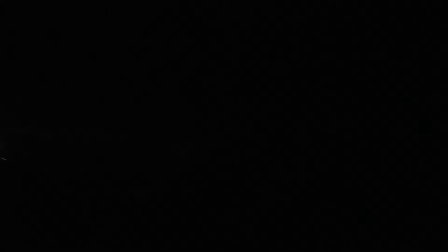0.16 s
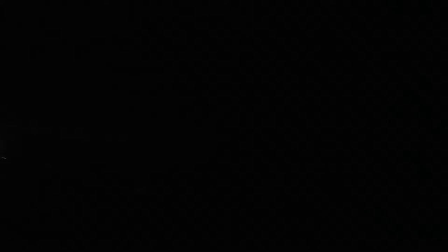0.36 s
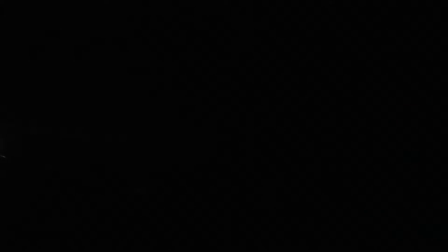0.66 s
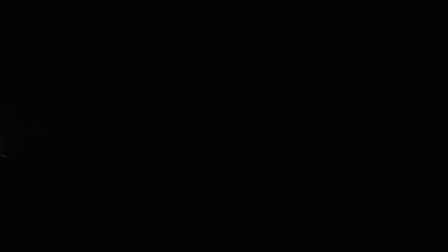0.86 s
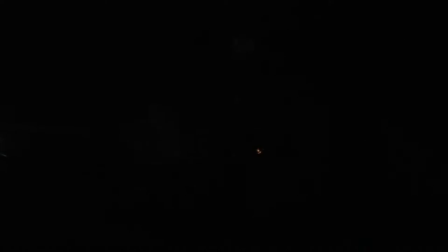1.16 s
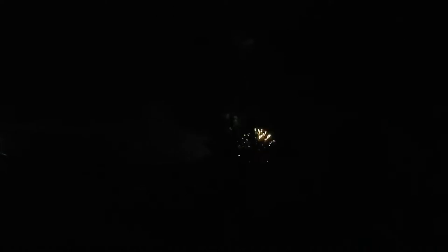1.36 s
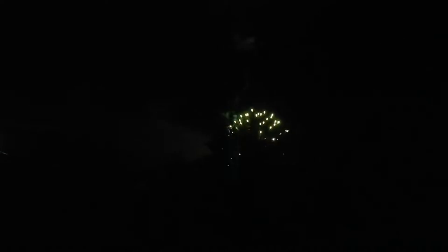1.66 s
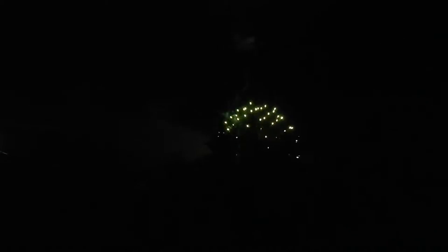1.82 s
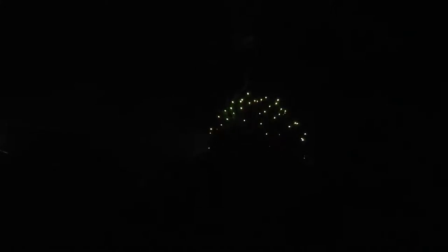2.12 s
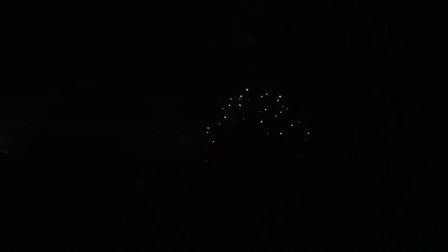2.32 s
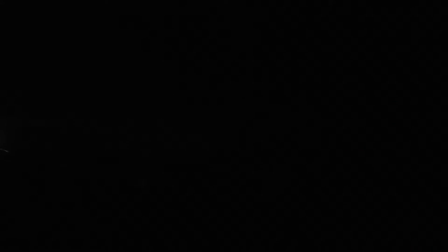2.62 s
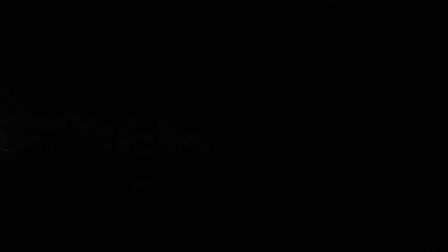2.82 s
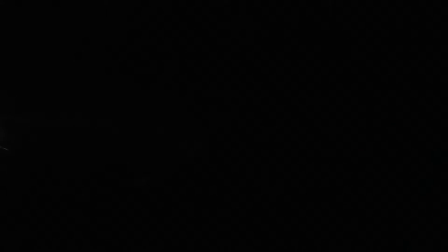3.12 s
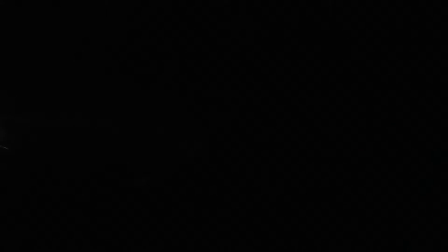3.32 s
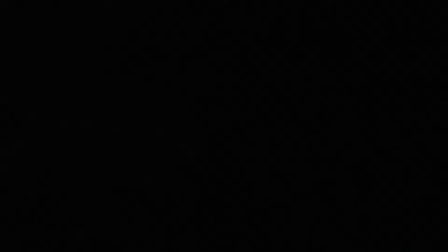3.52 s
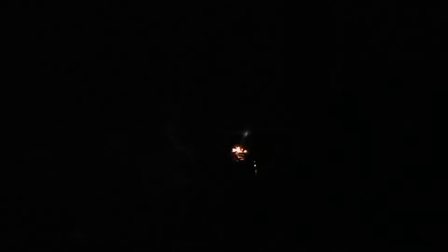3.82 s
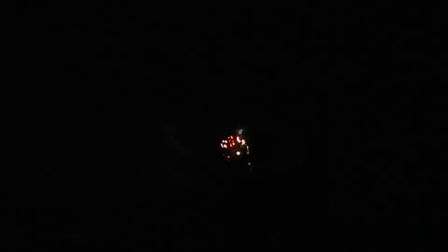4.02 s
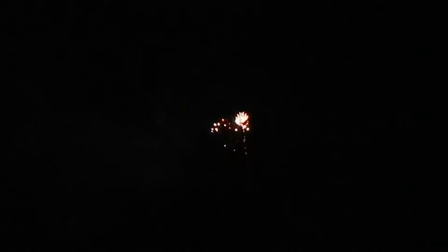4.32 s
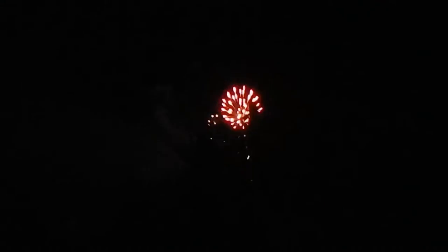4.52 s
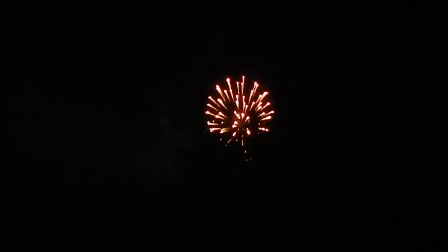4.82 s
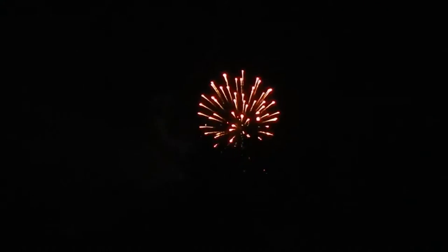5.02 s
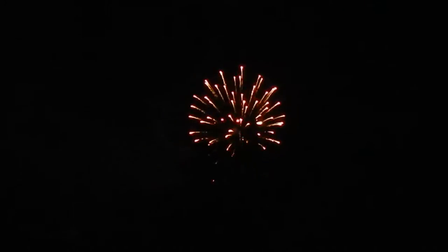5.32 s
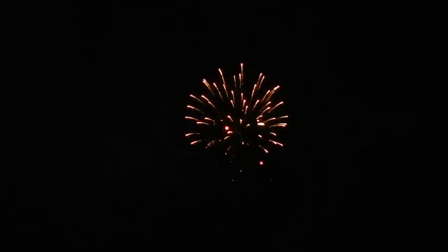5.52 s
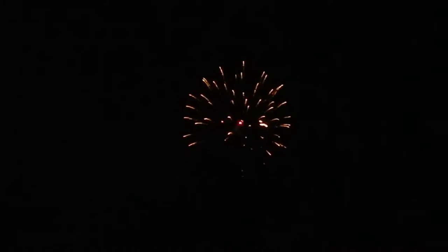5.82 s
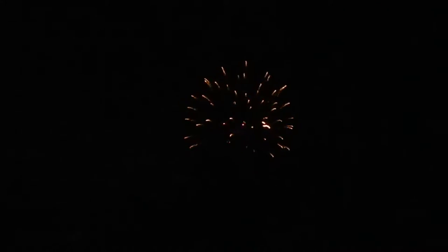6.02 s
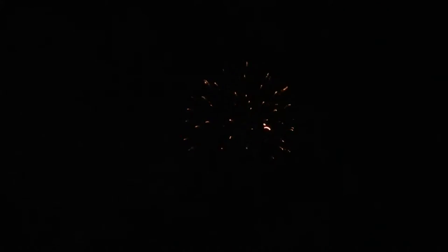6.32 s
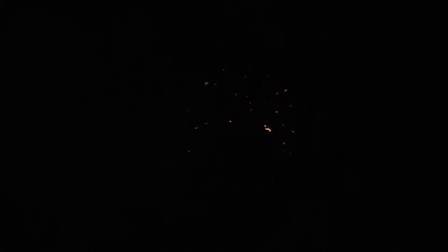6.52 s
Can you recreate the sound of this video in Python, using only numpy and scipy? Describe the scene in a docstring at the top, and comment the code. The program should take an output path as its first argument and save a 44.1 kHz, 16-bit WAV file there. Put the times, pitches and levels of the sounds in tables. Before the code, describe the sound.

Distant fireworks thump and crack in an irregular barrage, each bang slapping back and scattering into a rolling rumble across open ground at night.

```python
"""Distant fireworks at night

Fireworks burst far away over open ground. Each near bang is a dull thump (fading sine swings) with a crack
on top (ringing spikes); it returns as a slap from a wall and dies in a scattered tail of shaped noise.
Farther shells merge into a rolling rumble of popping noise. Insects shrill faintly (narrow noise, short
ticks), a soft tone hoots once, and the microphones hiss. The treble background drops suddenly several
times and creeps back; once the hiss, insect band, tails and rumble fall together for a moment."""
import sys
import numpy as np
from scipy import signal
from scipy.fft import rfft, irfft
from scipy.io import wavfile

SR = 44100
rng = np.random.default_rng(int(sys.argv[2]) if len(sys.argv) > 2 else 0)


def ratio_of_db(decibels):
    """Turn decibels (scalar or array-like) into linear amplitude factors; 0 dB maps to 1."""
    return 10 ** (np.asarray(decibels, float) / 20)


def transcribe(u):
    """Save the signal u as a 16-bit wav file named by the first command-line argument.

    u: samples, shape (n,) or (channels, n), limited to [-1, 1]; the rate is SR.
    q: integer samples, one column per channel.
    """
    v = np.clip(np.atleast_2d(u).T, -1, 1)
    q = np.round(v * 32767).astype(np.int16)
    wavfile.write(sys.argv[1], SR, q)


N = 293706  # length in samples

# Spectra, scaled to a common loudness when used: (frequency [Hz], relative level [dB])
HISS_SPECTRUM = [(2500, 3), (5000, 2), (7000, -1.5), (10000, -6.5), (15500, -10), (16400, -30)]
INSECT_SPECTRUM = [(3200, -19), (3500, -6), (4100, 2), (4500, 5), (4900, -1.5), (5150, -26)]
RUMBLE_SPECTRUM = [(25, -32), (50, -17.5), (110, -6.5), (210, 4), (280, -4), (345, -1.5), (380, -14.5),
                   (430, -5.5), (575, -8), (880, -14.5), (1050, -12.5), (1500, -20), (2000, -23),
                   (2500, -34), (3000, -42), (3300, -67.5)]
DEEP_SPECTRUM = [(18, -27), (40, -18.5), (54, -2.5), (75, -8), (100, -30.5)]
TAIL_SPECTRUM = [(30, -26), (60, -26), (110, 1.5), (200, 8.5), (330, 1.5), (400, 0.5), (600, -3.5),
                 (1100, -16.5), (2000, -21), (2500, -37.5), (3200, -52.5), (4500, -53), (6000, -92)]

# Sudden drops of the treble background: (time [s], depth [dB], creep back [dB/s])
TREBLE_DIPS = [(2.665, -10, 107), (3.468, -26.5, 28), (4.35, -16, 31), (4.73, -4.5, 4.5),
               (5.435, -16.5, 35.5), (6.174, -11, 30), (6.255, -27.5, 350), (6.425, -9.5, 38)]
# Loudness of the insect chorus: (time [s], level [dB])
CHORUS_LEVEL = [(0, -63.5), (2, -63.5), (4.5, -63.5), (4.75, -58), (5.3, -64), (6.66, -63.5)]
# Single insect chirps: (time [s], level [dB], frequency [Hz])
CHIRPS = [(0.858, -56.5, 4720), (3.4194, -55.5, 4230), (3.6353, -66, 4630), (4.0063, -57, 4860),
          (4.762, -48.5, 3690), (5.001, -54.5, 4210), (5.246, -53.5, 4750), (5.364, -56.5, 4880)]
# Path of one short hoot: (time [s], frequency [Hz], level [dB])
HOOT_PATH = [(5.33, 369.3, -43), (5.37, 437, -36), (5.402, 436, -35), (5.42, 403, -26)]
# Loudness of the rolling rumble: (time [s], level [dB])
ROLL_LEVEL = [(0, -34), (0.7, -33), (1.3, -33), (1.75, -35.5), (2.3, -36), (2.6, -34.5), (3.4, -34),
              (3.7, -40), (3.85, -38.5), (4.3, -36), (4.8, -30.5), (5.4, -34.5), (6.0, -34), (6.66, -35)]
# Additional deep booms, two of them right after near bangs: (time [s], level [dB])
EXTRA_BOOMS = [(0.075, -29.5), (4.72, -40), (6.35, -33)]
# Time for a tail to die by 60 dB: (frequency [Hz], decay time [s])
TAIL_DECAY = [(60, 0.62), (200, 0.36), (600, 0.46), (2000, 0.66), (5000, 0.68)]
# What the crack rings with after ground and air have coloured it: (frequency [Hz], width [Hz], level [dB])
CRACK_COLOURS = [(580, 168, -3), (1028, 352, 0.5), (1370, 83, -24), (1900, 250, -3.5)]
# Bright treble snaps on some near bangs: (time [s], level [dB])
SNAPS = [(0.687, -56), (1.8078, -40), (2.6514, -37.5), (3.085, -43), (3.6706, -59), (4.288, -36),
         (4.342, -37), (4.421, -54), (4.577, -54), (5.429, -32.5), (5.497, -57), (5.822, -52),
         (6.163, -29.5)]
# Near bangs: (time [s], crack level [dB], thump level [dB], upper partner level [dB], tail level [dB],
# echo strength [dB])
BANGS = [(0.061, -12.5, -10.5, -19, -13.5, -21), (0.581, -21, -19.5, -38, -16.5, -27.5),
         (0.688, -9, -12.5, -44, -14, -25), (0.984, -11, -9, -9, -11.5, -19.5),
         (1.808, -10.5, -10.5, -28, -12.5, -23), (2.647, -10.5, -7, -15, -16.5, -21.5),
         (2.943, -11, -11, -17, -15.5, -24.5), (3.085, -8.5, -10, -11, -12, -20.5),
         (3.669, -15, -12.5, -17, -19.5, -29.5), (3.712, -20.5, -19, -20.5, -24, -41),
         (4.285, -10.5, -10.5, -8, -18.5, -27), (4.34, -10.5, -8, -10, -16, -29.5),
         (4.419, -15, -19, -18, -24, -32), (4.578, -12, -15, -11.5, -21, -23),
         (4.744, -24.5, -27, -32, -29, -29.5), (5.13, -15.5, -20.5, -37, -19, -21.5),
         (5.426, -5.5, -9, -12, -17, -25), (5.496, -16, -25, -15.5, -21.5, -31),
         (5.822, -8.5, -14, -8, -13.5, -26.5), (6.164, -5, -7, -10, -17.5, -26.5),
         (6.339, -22.5, -23, -40, -35, -25)]
# Echoes of every near bang, levels relative to its echo strength: (lag [s], thump frequency [Hz],
# crack level [dB], thump level [dB], upper partner level [dB], tail level [dB])
ECHOES = [(0.016, 200, -7.5, -8, -16.5, -10.5), (.057, 224, 1, -7, -10, -8),
          (0.101, 200, -15, -5.5, -20, -21)]
# Faint far thuds and pops without echoes: (time [s], crack level [dB], thump frequency [Hz], thump level [dB])
THUDS = [(1.28, -27, 214, -32), (1.412, -46, 203, -23), (2.008, -51, 199, -21), (2.234, -44, 190, -26.5),
         (2.279, -31.5, 198, -36.5), (2.501, -28, 200, -44.5), (2.566, -34, 205, -28),
         (3.418, -40, 218, -37), (3.843, -31.5, 198, -34.5), (4.998, -29.5, 224, -44),
         (5.046, -50, 226, -28.5), (5.675, -32.5, 191, -29.5)]

# background
HISS_DB, INSECT_DIP_SHARE = -61.5, 0.32
DIP_LIFT_S, DIP_LIFT_SHARE = 0.011, 0.7  # near bangs briefly lift the dips
HUSH_FROM_S, HUSH_TO_S, HUSH_DB, HUSH_EDGE_S = 3.468, 3.66, -11.5, 0.0084
DEEP_DB, BOOM_RE_TAIL_DB, BOOM_RISE_S, BOOM_T60_S = -52.5, -27, 0.012, 0.61
# bangs; the upper partner and tail of a thud are set relative to its thump
THUD_UPPER_DB, THUD_TAIL_DB = -23, -12.5
CRACK_LAG_S, CRACK_SPREAD_S, CRACK_GAIN_DB = 0.001, 0.0013, 1
ECHO_SMEAR = 1.7  # echoed cracks are drawn out by this factor
SNAP_SPREAD_S, SNAP_GAIN_DB = 0.0011, 9
AIR_CUT_HZ = 1820
# the wall favours the middle range and stands aside
WALL_HZ, WALL_WIDTH_HZ, WALL_GAIN_DB, WALL_PAN_DB = 850, 650, 4.5, -0.5
THUMP_HZ, UPPER_RATIO, THUMP_CUT_HZ = 198.8, 1.62, 104
THUMP_LAG_S, THUMP_RISE_S, THUMP_FALL_S, THUMP_END_S = -0.00025, 0.0016, 0.01, 0.014
THUMP_CREST_DB, UPPER_CREST_DB = 9.0, 1
# stereo and housing
LEFT_DB, SIDE_DB = -0.57, -22.5
NOTCH_HZ = 3200


def curve(rows):
    """Join each column of a table by straight lines in time."""
    s, *columns = np.transpose(rows)
    return [np.interp(np.arange(N) / SR, s, column) for column in columns]


def at_hz(points, hz):
    """Read a table along a logarithmic frequency axis."""
    table = np.array(points)
    return np.interp(np.log(hz), np.log(table[:, 0]), table[:, 1])


def rms_one(x):
    """Scale a sound to an average strength (rms) of 1."""
    return x / np.sqrt(np.mean(x ** 2) + 1e-20)


def drift(rate):
    """Slow random wandering with spread 1; a higher rate wanders faster."""
    r = np.exp(-80 * np.pi * rate / SR)
    white = rng.standard_normal(N // 40 + 2002)  # one value per 40 samples
    slow = signal.lfilter([1], [1, -2 * r, r * r], white)[2000:]
    return np.interp(np.arange(N) / 40, np.arange(len(slow)), rms_one(slow))


def coloured(x, spectrum):
    """Give white noise the balance of low and high sounds in a table; rms 1."""
    hz = np.fft.rfftfreq(x.shape[-1], 1 / SR) + 1
    inside = (hz > spectrum[0][0]) & (hz < spectrum[-1][0])
    return rms_one(irfft(rfft(x) * ratio_of_db(at_hz(spectrum, hz)) * inside, x.shape[-1]))


def filtered(x, order, cut_hz, kind="low"):
    """Keep only the sound below, above or between the given frequencies."""
    return signal.sosfilt(signal.butter(order, cut_hz, kind, fs=SR, output="sos"), x)


def resonance(x, hz, width):
    """Ring around one frequency, as a two-pole filter with gain 1 on top."""
    r = np.exp(-np.pi * width / SR)
    poles = [1, -2 * r * np.cos(2 * np.pi * hz / SR), r * r]
    return signal.lfilter([(1 - r * r) / 2, 0, (r * r - 1) / 2], poles, x)


def swell_and_die(power, rise_s, fall):
    """Turn each spike of power into a swell that rises and then shrinks by the factor fall per sample."""
    rise = np.exp(-1 / (rise_s * SR))
    dying = signal.lfilter([1], [1, -fall], power)
    return signal.lfilter([1 - rise], [1, -rise], dying)


def wide(mid, side):
    """Make a nearly mono pair with a little unrelated side sound."""
    return mid + ratio_of_db(SIDE_DB) * side * [[1], [-1]]


def popping(per_s, pop_db, spread_db):
    """White noise for mid and side; short bursts of crackle stand out of the mid."""
    white = rng.standard_normal((2, N))
    strength = ratio_of_db(pop_db + spread_db * np.minimum(rng.exponential(1, N), 2.5))
    born = (rng.random(N) < per_s / SR) * strength
    white[0] *= 1 + signal.lfilter([1], [1, -np.exp(-1 / (0.0016 * SR))], born)  # 1.6 ms fade
    return white


def hush():
    """Level change in dB that lowers the background for one moment."""
    t = np.arange(N) / SR
    return HUSH_DB * np.clip(np.minimum(t - HUSH_FROM_S, HUSH_TO_S - t) / HUSH_EDGE_S, 0, 1)


def treble_dip():
    """Deepest running dip plus the hush, in dB; a near bang lifts a dip unless it has only just begun."""
    t = np.arange(N) / SR
    lift = np.max([np.exp(-((t - s - DIP_LIFT_S) / DIP_LIFT_S) ** 2) for s, *_ in BANGS], axis=0)
    kept = 1 - DIP_LIFT_SHARE * lift
    dips = []
    for s, depth, creep in TREBLE_DIPS:
        dip = np.minimum(depth + creep * (t - s), 0) * (t > s)
        dips.append(dip * np.where(t > s + 4 * DIP_LIFT_S, kept, 1))
    return np.min(dips, axis=0) + hush()


def hiss(dip_db):
    """Microphone hiss: steady shaped noise, separate on each side, lowered by the dips."""
    return ratio_of_db(HISS_DB + dip_db) * coloured(rng.standard_normal((2, N)), HISS_SPECTRUM)


def insects(level_db, flutter_db=2.0):
    """A narrow shrill noise band from all around, fluttering separately on each side."""
    flutter = flutter_db * np.array([drift(30), drift(30)])
    return ratio_of_db(level_db + flutter) * coloured(rng.standard_normal((2, N)), INSECT_SPECTRUM)


def chirps():
    """Brief ticks from one insect to the side: short tones blurred by a randomly wandering phase."""
    out, t = np.zeros(N + SR), np.arange(SR // 20) / SR
    for s, level_db, hz in CHIRPS:
        i = round(s * SR)
        swell = t / 0.0028 * np.exp(1 - t / 0.0031)
        blur = np.cumsum(rng.normal(0, 0.13, len(t)))
        out[i:i + len(t)] += ratio_of_db(level_db) * swell * np.sin(2 * np.pi * hz * t + blur)
    return out[:N] * ratio_of_db(np.array([[4.0], [-8.0]]))  # left, right


def hoot():
    """A soft lone sine tone that slides upward and then sinks a little."""
    hz, level_db = curve(HOOT_PATH)
    t = np.arange(N) / SR
    gate = np.clip(np.minimum(t - HOOT_PATH[0][0], HOOT_PATH[-1][0] - t) / 0.0098, 0, 1)
    return np.sqrt(2) * ratio_of_db(level_db) * gate * np.sin(2 * np.pi * np.cumsum(hz) / SR)


def deep_level():
    """Level in dB of the deepest rumble: a floor plus booms that swell and die, one with each near bang."""
    power = np.full(N, 1e-18)
    bang_booms = [(s, tail + BOOM_RE_TAIL_DB) for s, *_, tail, _ in BANGS]
    for s, db in EXTRA_BOOMS + bang_booms:
        power[round(s * SR)] += ratio_of_db(db) ** 2
    swell = swell_and_die(power, BOOM_RISE_S, ratio_of_db(-2 * 60 / (BOOM_T60_S * SR)))
    return 10 * np.log10(ratio_of_db(DEEP_DB + hush()) ** 2 + swell)


def rumble(level_db, deep_db, lumpy_db=1.5):
    """Far bangs and their echoes overlap: smeared noise with small pops, and slow deep booms below."""
    noise = wide(*coloured(popping(per_s=40.0, pop_db=-6.0, spread_db=1.0), RUMBLE_SPECTRUM))
    roll = ratio_of_db(level_db + lumpy_db * drift(25)) * noise
    deep = coloured(rng.standard_normal((2, N)), DEEP_SPECTRUM)
    return roll + ratio_of_db(deep_db) * (deep[0] + ratio_of_db(-14.0) * deep[1] * [[1], [-1]])


def arrivals():
    """List bangs, echoes and far thuds as they reach the listener."""
    # (time [s], crack [dB], thump [Hz], thump [dB], upper partner [dB], tail [dB], echoed or not)
    rows = [(s, crack, THUMP_HZ, thump, upper, tail, False) for s, crack, thump, upper, tail, _ in BANGS]
    for s, *_, echo in BANGS:
        for lag, hz, crack, thump, upper, tail in ECHOES:
            rows.append((s + lag, echo + crack, hz, echo + thump, echo + upper, echo + tail, True))
    for s, crack, hz, thump in THUDS:
        rows.append((s, crack, hz, thump, thump + THUD_UPPER_DB, thump + THUD_TAIL_DB, False))
    return np.array(rows, float)


def tails():
    """Scattered returns from trees and ground: each octave swells briefly and dies at its own rate."""
    rows, out = arrivals(), 0
    power = np.full(N, 1e-18)
    power[(rows[:, 0] * SR).astype(int)] = ratio_of_db(rows[:, 5]) ** 2
    noise = wide(*coloured(popping(per_s=90.0, pop_db=4.0, spread_db=3.0), TAIL_SPECTRUM))
    edges = 30 * 2 ** np.arange(9)  # octave borders in Hz
    for low, high in zip(edges, edges[1:]):
        t60_s = at_hz(TAIL_DECAY, np.sqrt(low * high))
        level = swell_and_die(power, 0.0052, ratio_of_db(-120 / (t60_s * SR)))
        band = filtered(noise, 2, [low, high], "band")
        out = out + np.sqrt(level) * ratio_of_db(1.5 * drift(25)) * band
    return out


def snaps():
    """Short bright clicks: three close spikes, kept only in the treble."""
    table = np.array(SNAPS)
    clicks = np.full(N, 1e-18)
    spike_s = table[:, :1] + SNAP_SPREAD_S * rng.uniform(0, 2.2, (len(table), 3))
    np.add.at(clicks, (spike_s * SR).astype(int), -ratio_of_db(table[:, 1:2] + SNAP_GAIN_DB))
    return filtered(clicks, 2, [3300, 8000], "band") + ratio_of_db(-12.5) * filtered(clicks, 2, 8000, "high")


def cracks():
    """The shock front, torn by turbulence into spikes that swell and fade, rings the crack colours."""
    rows = arrivals()
    echoed = rows[:, 6:]
    late = np.arange(10) + rng.uniform(-0.55, 0.33, (len(rows), 10))
    size = ratio_of_db(-3.0 * np.abs(late - 1.3)) * rng.choice([-1, 1], late.shape)
    size[:, 0] = -1
    spike_s = rows[:, :1] + CRACK_LAG_S + CRACK_SPREAD_S * ECHO_SMEAR ** echoed * late
    at = np.minimum((spike_s * SR).astype(int), N - 1)
    paths = np.full((2, N), 1e-18)  # direct, echoed
    np.add.at(paths, (echoed.astype(int), at), size * ratio_of_db(rows[:, 1:2]))
    slap = ratio_of_db(WALL_GAIN_DB) * resonance(paths[1], WALL_HZ, WALL_WIDTH_HZ)
    front = paths[0] + slap * ratio_of_db(np.array([[WALL_PAN_DB], [-WALL_PAN_DB]]))
    body = 0
    for hz, width, db in CRACK_COLOURS:
        # a unit spike rings each colour to a height that does not depend on its width
        gain = ratio_of_db(db + CRACK_GAIN_DB) * SR / (2 * np.pi * width)
        body = body + gain * resonance(front, hz, width)
    # the long path through air dulls the top; a little leaks through above it
    dull = filtered(body, 6, AIR_CUT_HZ)
    leak = ratio_of_db(-31.0) * filtered(body, 2, [2500, 4800], "band")
    return dull + leak + snaps()


def thumps():
    """A suction dip, then a few swings that swell, shrink and stop; a higher partner rides along."""
    out, t = np.zeros(N + SR), np.arange(SR // 5) / SR
    swell = (1 - np.exp(-(t / THUMP_RISE_S) ** 2)) * np.exp(-t / THUMP_FALL_S + 0.22)
    swell /= 1 + np.exp(np.minimum((t - THUMP_END_S) / 0.0027, 50))
    for s, _, hz, thump_db, upper_db, *_ in arrivals():
        swing = ratio_of_db(thump_db + THUMP_CREST_DB) * np.sin(2 * np.pi * hz * t)
        upper_turns = UPPER_RATIO * (hz * t - 3 / 4) + 3 / 4  # crests together on the first push
        swing += ratio_of_db(upper_db + UPPER_CREST_DB) * np.sin(2 * np.pi * upper_turns)
        i = round((s + THUMP_LAG_S) * SR)
        out[i:i + len(t)] -= swell * swing
    return filtered(out[:N], 2, THUMP_CUT_HZ, "high")


def scene():
    """The display lies slightly right of centre; the two ports differ near the housing's notch."""
    (roll_db,), (chorus_db,), dip_db = curve(ROLL_LEVEL), curve(CHORUS_LEVEL), treble_dip()
    far = ratio_of_db(hush()) * tails() + rumble(roll_db + hush(), deep_level())
    front = thumps() + cracks() + hoot() + far
    front[0] = ratio_of_db(LEFT_DB) * np.roll(front[0], 1)  # left is softer and one sample later
    front[1] += 0.68 * resonance(front[1], 3160, 1400)
    chorus = insects(chorus_db + INSECT_DIP_SHARE * dip_db)
    return front + chorus + chirps() + hiss(dip_db)


def low_pass(x):
    """Removes everything above the highest recorded frequency."""
    return signal.sosfilt(signal.butter(12, 15900, fs=SR, output="sos"), x)


def record(dry):
    """The housing cancels a narrow band, then the peaks are rounded."""
    notched = dry - resonance(dry, NOTCH_HZ, 140)
    mix = 1.24 * np.tanh(notched / 1.561)
    return low_pass(mix)


dry = scene()
out = record(dry)
transcribe(out)
```